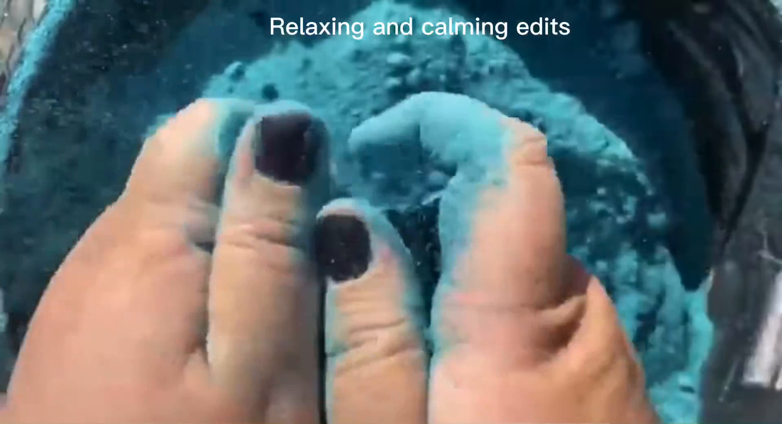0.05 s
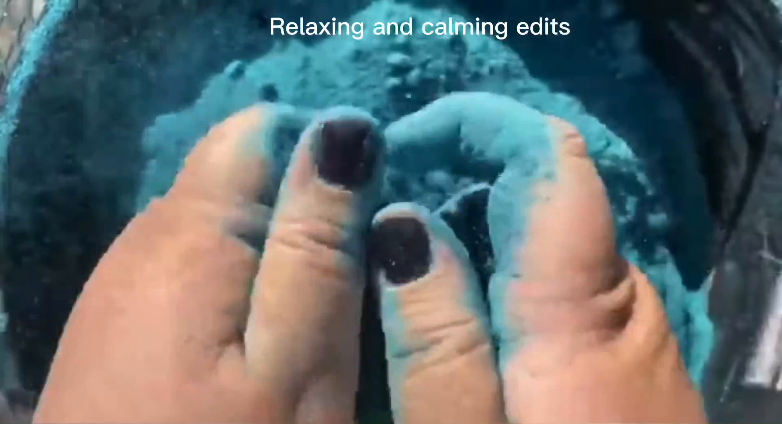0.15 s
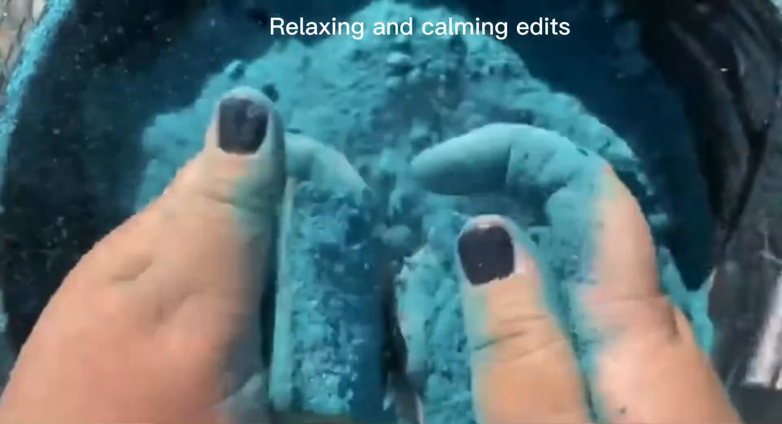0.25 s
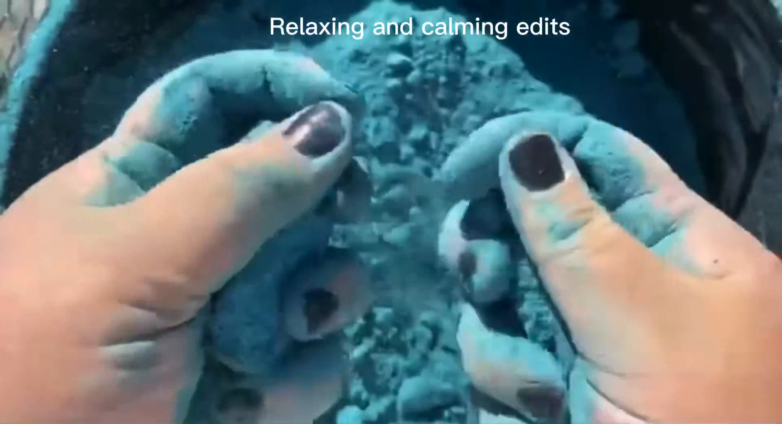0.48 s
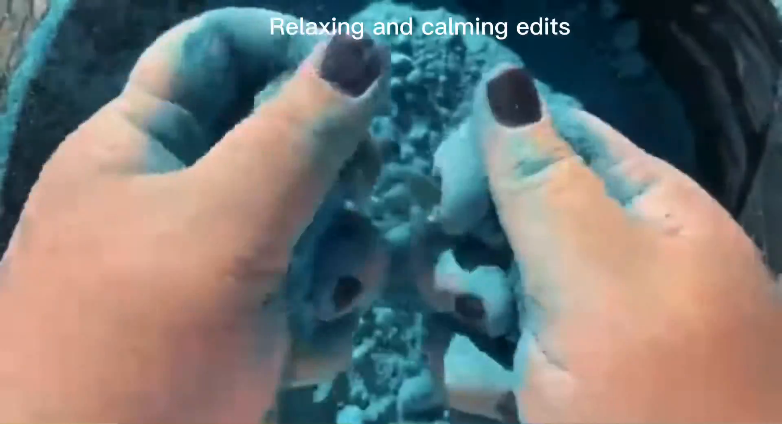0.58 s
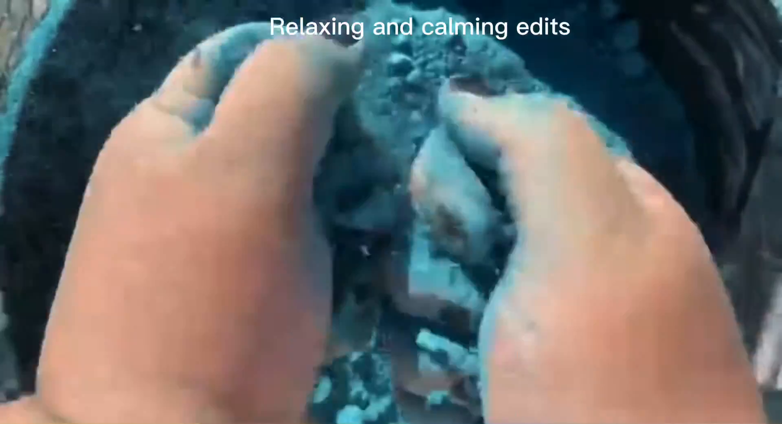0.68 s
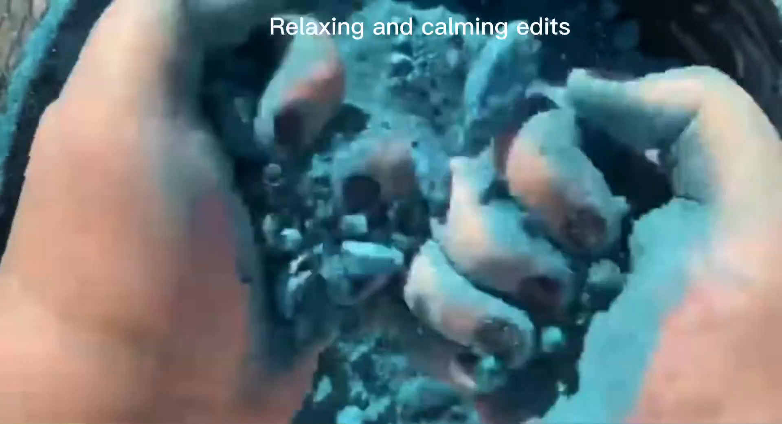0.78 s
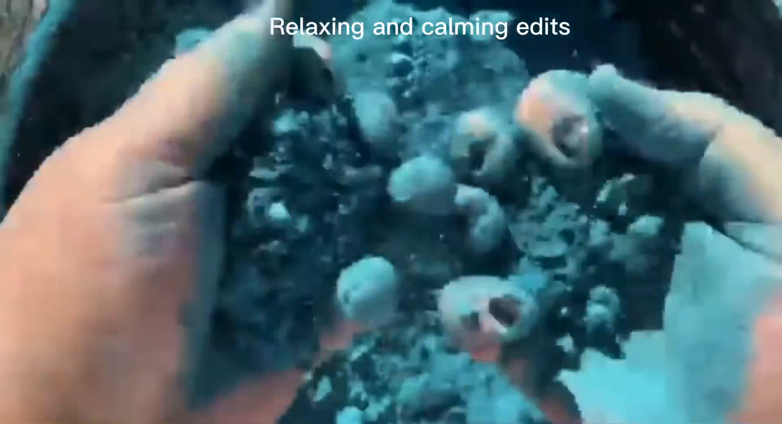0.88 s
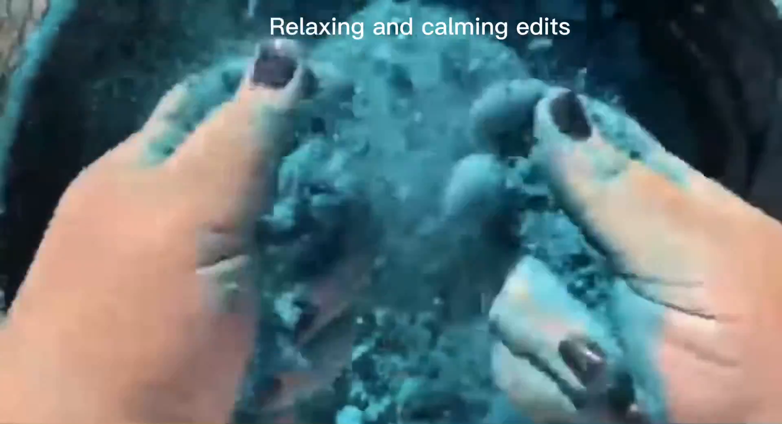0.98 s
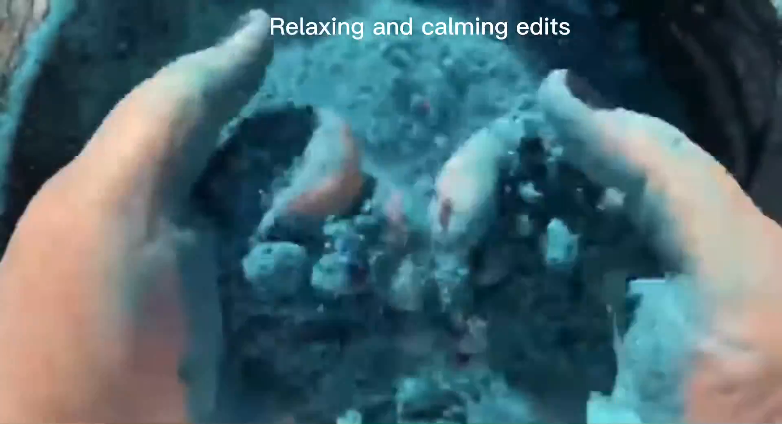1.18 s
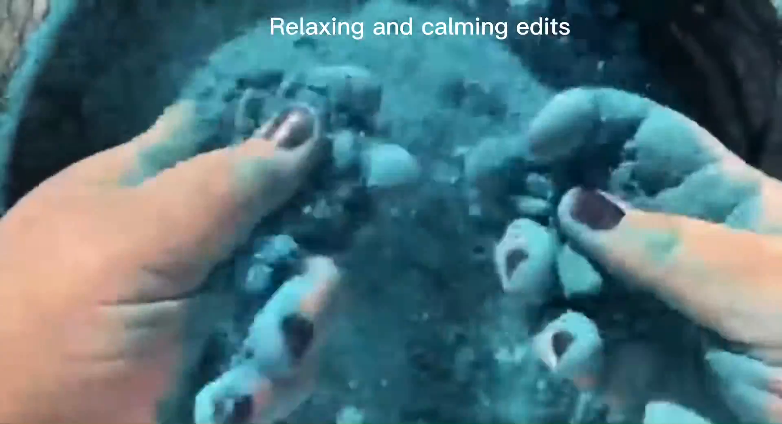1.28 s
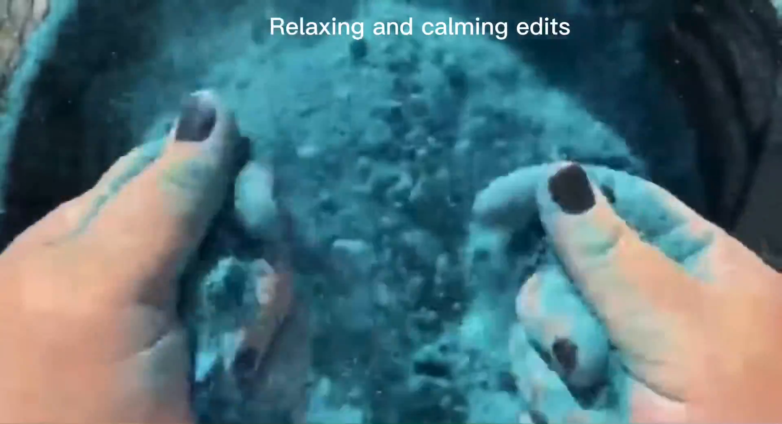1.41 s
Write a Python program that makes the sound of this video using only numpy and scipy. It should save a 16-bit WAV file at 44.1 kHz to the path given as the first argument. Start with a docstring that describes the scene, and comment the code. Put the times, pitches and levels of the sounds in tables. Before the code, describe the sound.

Chalk cracks and crumbles by hand, heard up close in a room with a low rumble. Sharp snaps come first, then small crunches, duller snaps and one light knock on a bowl, while grit and powder keep falling.

```python
"""In a room with a low rumble, two hands break a slab of pressed gym chalk over a bowl, heard up close.
The slab gives way in a few dry snaps, each a burst of tiny cracks and the recoil of the freed piece.
Pieces crunch, crumbs pop, grit trickles down, powder hisses between the fingers and the hands bump.
Late on, two dull snaps ring faintly, one lump knocks the bowl and a wavering hum joins the rumble."""
import sys
import numpy as np
from scipy import signal
from scipy.fft import rfft, irfft
from scipy.io import wavfile

SR = 44100
rng = np.random.default_rng(int(sys.argv[2]) if len(sys.argv) > 2 else 0)


def file_out(sig):
    """Save sig as 16-bit WAV at sys.argv[1]."""
    # one column per channel
    cols = np.atleast_2d(sig).T
    # limit, then scale
    lim = np.clip(cols, -1, 1)
    pcm = np.round(lim * 32767).astype(np.int16)
    wavfile.write(sys.argv[1], SR, pcm)


N = 63945
TIME = np.arange(N) / SR
CRACK_RISE_S = 0.000045


def from_db(db):
    """Decibels to gain."""
    return 10 ** (np.asarray(db) / 20)


def unit_rms(x):
    """Scale to an rms of 1."""
    return x / np.sqrt(np.mean(x ** 2) + 1e-20)


def fader(points):
    """A gain curve through (time [s], level [dB]) points."""
    return from_db(np.interp(TIME, *np.transpose(points)))


def swell(peak_s, rise_s, fall_s):
    """Exponential rise to a peak, then exponential fall."""
    return np.exp(-np.maximum((peak_s - TIME) / rise_s, (TIME - peak_s) / fall_s))


def drift(rate_hz):
    """Smooth random motion with an rms of 1."""
    pole = np.exp(-2 * np.pi * rate_hz / SR)
    return unit_rms(signal.lfilter([1], [1, -2 * pole, pole * pole], rng.standard_normal(2 * N))[N:])


def equalise(x, spectrum, tilt_db=0):
    """Minimum-phase EQ that follows a spectrum, tilted by tilt_db per octave."""
    size = 4096
    hz, db = np.transpose(spectrum)
    bin_octaves = np.log2(np.maximum(np.arange(size // 2 + 1) * SR / size, 1))
    tilted_db = db + tilt_db * np.log2(hz / hz.mean())
    gain = from_db(np.interp(bin_octaves, np.log2(hz), tilted_db))
    cepstrum = irfft(np.log(gain))
    cepstrum[1:size // 2] *= 2  # folded, so nothing rings ahead of an attack
    cepstrum[size // 2 + 1:] = 0
    impulse_response = irfft(np.exp(rfft(cepstrum)))
    return signal.fftconvolve(x, impulse_response)[:len(x)]


def grains(per_s, spread_db):
    """Random clicks, many small and a few large."""
    onsets = rng.random(N) < per_s / SR
    sizes = from_db(spread_db * np.minimum(rng.exponential(1, N), 4))
    return onsets * sizes * rng.choice([-1, 1], N)


def click(at_s, db):
    """One impulse."""
    return from_db(db) * (np.arange(N) == int(at_s * SR))


def ring(x, hz, t60_s):
    """One resonance: a unit click starts a decaying sine of height 1."""
    decay = from_db(-60 / (t60_s * SR))
    angle = 2 * np.pi * hz / SR
    return signal.lfilter([0, np.sin(angle)], [1, -2 * decay * np.cos(angle), decay * decay], x + 1e-18)


def cracking(envelope, db, tilt_db):
    """Chalk fails in a run of tiny cracks; db is the rms level at the top of the envelope."""
    # tone of breaking chalk: (frequency [Hz], relative level [dB])
    crack_spectrum = [(90, -28), (250, -13.5), (700, -1.5), (1200, 0), (2300, 2.5), (3800, 0), (6000, -5),
                      (9500, -8), (13000, -12.5), (16000, -22.5)]
    cracks = equalise(grains(per_s=12000, spread_db=3.5) * envelope, crack_spectrum, tilt_db)
    return from_db(db) * unit_rms(cracks) * np.sqrt(np.mean(envelope ** 2))


def snaps():
    """A crack runs through the slab in milliseconds and the freed piece recoils, damped by the hand."""
    # fractures, sharp in the slab and duller in small pieces: (time [s], recoil level [dB],
    # recoil pitch [Hz], crack level [dB], crack length [s], crack brightness [dB/octave])
    fractures = [(0.2296, 1, 444, -12.5, 0.0033, 2.5), (0.2299, -3, 1290, -10.5, 0.00044, 3.5),
                 (0.2339, 2, 2010, -13.5, 0.00093, 0.5), (0.2349, -8, 2920, -8, 0.0012, 2),
                 (0.628, -5, 575, -13.5, 0.00086, 0.5), (0.631, -12, 2600, -26, 0.0009, 0),
                 (0.68, -21, 307, -19.5, 0.0018, 0.3), (0.6831, -9, 330, -22.5, 0.00046, -1),
                 (0.6832, -12, 860, -22, .0006, 3.5), (0.6844, 6.5, 1850, -16, 0.0013, 1.7),
                 (0.687, -14, 2500, -21.5, 0.0028, 1.3), (0.7807, -27, 265, -35.5, 0.00068, -2.5),
                 (1.0087, -10, 1150, -32.5, .003, -4), (1.0116, -16.5, 570, -36, 0.004, -3),
                 (1.0573, -18.5, 1850, -34.5, .0025, -5)]
    recoil_cycles, low_cut_ratio = 2.79, 0.41  # a piece radiates little below this share of its pitch
    out = np.zeros(N)
    for at_s, recoil_db, hz, crack_db, length_s, tilt_db in fractures:
        age = np.maximum(TIME - at_s, 0)
        envelope = np.minimum(age / CRACK_RISE_S, 1) * np.exp(-(age / length_s) ** 2 / 2)
        recoil = ring(click(at_s, recoil_db), hz, t60_s=recoil_cycles / hz)
        low_cut = signal.butter(2, low_cut_ratio * hz, "high", fs=SR, output="sos")
        out += cracking(envelope, crack_db, tilt_db) - signal.sosfilt(low_cut, recoil)
    return out


def crunches():
    """Cracks multiply as the fingers press, and die away once the piece has collapsed."""
    # crushed pieces: (peak time [s], level [dB], swell [s], release [s], brightness [dB/octave])
    crushes = [(0.057, -39, 0.0049, 0.0028, 6.5), (0.236, -33.5, 0.0027, 0.0066, 3.5),
               (0.254, -32.5, 0.0033, 0.0075, 2.3), (0.336, -39, 0.0004, 0.0018, 5),
               (0.549, -26.5, 0.005, 0.0014, 3), (0.673, -35, 0.0024, 0.0077, 2.5),
               (0.691, -33, 0.0013, 0.0046, -0.5), (0.712, -38, 0.00083, 0.003, -1),
               (0.743, -37, 0.003, 0.0087, 2.5), (0.765, -38.5, 0.005, 0.006, 1.5),
               (0.799, -35, 0.003, 0.0038, 15), (0.882, -42, 0.0059, 0.0057, 5.5),
               (1.082, -38.5, 0.0047, 0.0027, -5), (1.125, -37.5, 0.003, 0.0015, 6)]
    return sum(cracking(swell(peak_s, rise_s, fall_s), db, tilt_db)
               for peak_s, db, rise_s, fall_s, tilt_db in crushes)


def crumb_pops():
    """Single crumbs burst, each with a tick about a millisecond long."""
    # popping crumbs: (time [s], level [dB])
    pops = [(0.254, -28), (0.261, -30), (0.7321, -35), (0.749, -29), (0.757, -28), (0.7691, -29.5),
            (0.8027, -34.5), (0.848, -33.5), (1.265, -33), (1.3607, -32.5), (1.3928, -29.5)]
    return sum(cracking(swell(at_s, CRACK_RISE_S, fall_s=0.00098), db, tilt_db=-0.8) for at_s, db in pops)


def rings_and_knock():
    """Faint ringing under two dull snaps, then one soft lump knocks the powder-damped bowl."""
    # two faint rings, then the knock: (time [s], drive level [dB])
    onsets = [(1.0078, -21), (1.058, -25), (1.167, -9.5)]
    # short resonances: (frequency [Hz], gain before the low cut [dB], time to fall 60 dB [s])
    modes = [(662, -5.5, 0.025), (1058, -3.5, 0.022), (1320, -1.5, 0.017), (1620, -15, 0.015),
             (2120, -22, .016), (2860, -9.5, .011)]
    softness_hz, low_cut_hz = 2780, 864
    pulses = sum(click(at_s, db) for at_s, db in onsets)
    pole = np.exp(-2 * np.pi * softness_hz / SR)  # a soft attack with little treble
    soft_pulses = signal.lfilter([(1 - pole) ** 2], [1, -2 * pole, pole * pole], pulses)
    ringing = sum(from_db(db) * ring(soft_pulses, hz, t60_s) for hz, db, t60_s in modes)
    return signal.sosfilt(signal.butter(4, low_cut_hz, "high", fs=SR, output="sos"), ringing)


def grit_trickle():
    """Grit breaks off and falls from the hands in clumps."""
    # flow of grit: (time [s], level [dB])
    flow = [(0, -54.5), (.1, -62.5), (.22, -80), (.27, -60), (.37, -54.5), (.48, -73), (.53, -48.5),
            (.59, -53.5), (.66, -49.5), (.71, -43), (.77, -45), (.82, -49.5), (.92, -46.5), (1.09, -40),
            (1.15, -47), (1.24, -45), (1.31, -55), (1.39, -45.5), (1.45, -47.5)]
    # tone of falling grit: (frequency [Hz], relative level [dB])
    grit_spectrum = [(150, -1), (500, -1.5), (800, -3.5), (1300, -1), (2400, -1), (4000, -5), (6300, -14),
                     (9000, -11), (13000, -16.5), (16000, -20.5)]
    clump_db = 2
    grit = grains(per_s=4000, spread_db=3.5) * from_db(clump_db * drift(rate_hz=62))
    return fader(flow) * unit_rms(equalise(grit, grit_spectrum))


def powder_hiss():
    """Fine dust rubs on skin with a thin hiss."""
    # rubbing between the fingers: (time [s], level [dB])
    rubbing = [(0, -70), (.1, -56), (.22, -84), (.325, -57), (.34, -49), (.385, -47.5), (.41, -56.5),
               (.5, -55), (.56, -47.5), (.65, -51), (.76, -53), (.99, -48), (1.12, -48), (1.16, -51.5),
               (1.3, -52.5), (1.41, -47), (1.45, -47)]
    # airy tone of the powder: (frequency [Hz], relative level [dB])
    powder_spectrum = [(1000, -30), (4000, -10), (6500, -6), (8200, -2.5), (9500, 0), (11000, -8),
                       (13000, -9), (16000, -17)]
    clump_db = 3
    dust = grains(per_s=13000, spread_db=4) * from_db(clump_db * drift(rate_hz=47))
    return fader(rubbing) * unit_rms(equalise(dust, powder_spectrum))


def hand_bumps():
    """The hands bump softly as a piece gives way."""
    # dull, low thumps: (time [s], level [dB], pitch [Hz])
    thumps = [(0.734, -29.5, 55), (1.007, -35.5, 172), (1.054, -30, 84)]
    return sum(ring(click(at_s, db), hz, t60_s=0.065) for at_s, db, hz in thumps)


def reflections(x):
    """A faint, short scatter off the bowl and the table."""
    level_db, t60_s = -35, 0.088
    age = TIME[:SR // 4]
    tail = rng.standard_normal(len(age)) * from_db(-60 * age / t60_s)
    return from_db(level_db) * signal.fftconvolve(x, tail / np.linalg.norm(tail))[:N]


def room_rumble():
    """Steady, bass-heavy room tone."""
    # tone of the room: (frequency [Hz], relative level [dB])
    room_spectrum = [(20, 1), (45, -5), (110, -9), (170, -17.5), (280, -19.5), (650, -17.5), (850, -23.5),
                     (1100, -22.5), (2500, -37), (8000, -42), (16000, -56)]
    return from_db(-43) * unit_rms(equalise(rng.standard_normal(N), room_spectrum))


def low_hum():
    """A low hum comes in towards the end, its pitch and level wavering together."""
    pitch_hz, pitch_swing, level_swing_db = 92, 0.052, 12.5
    start_s, fade_s = 1.03, 0.023
    waver = np.tanh(drift(rate_hz=12))
    phase = 2 * np.pi * np.cumsum(pitch_hz * (1 + pitch_swing * waver)) / SR
    hum = unit_rms(from_db(level_swing_db * waver) * np.sin(phase))
    fade_in = np.clip((TIME - start_s) / fade_s, 0, 1)
    return from_db(-47.5) * hum * fade_in


def scene():
    """The chalk, close and nearly dry, over the room tone, in mono."""
    chalk = snaps() + crunches() + crumb_pops() + rings_and_knock() + grit_trickle() + powder_hiss()
    return (chalk + reflections(chalk) + hand_bumps() + room_rumble() + low_hum())[None]


def record(dry):
    """Peaks clip at full scale, then a steep high cut removes everything above 16 kHz."""
    high_cut = signal.ellip(10, 0.1, 80, 16000, fs=SR, output="sos")
    return signal.sosfilt(high_cut, np.clip(dry, -1, 1))


dry = scene()
out = record(dry)
file_out(out)
```